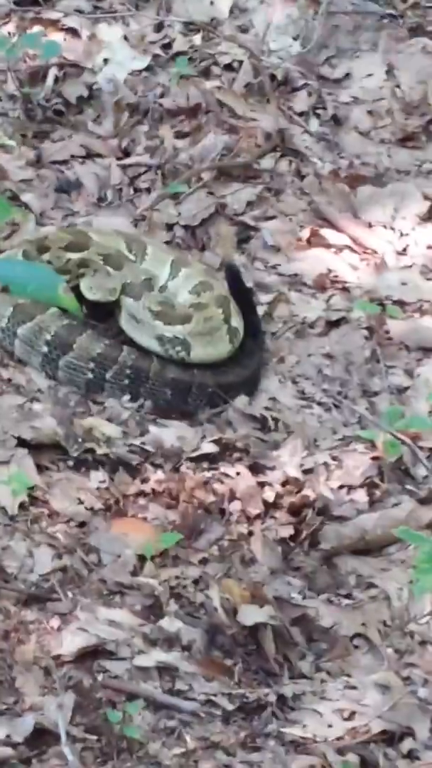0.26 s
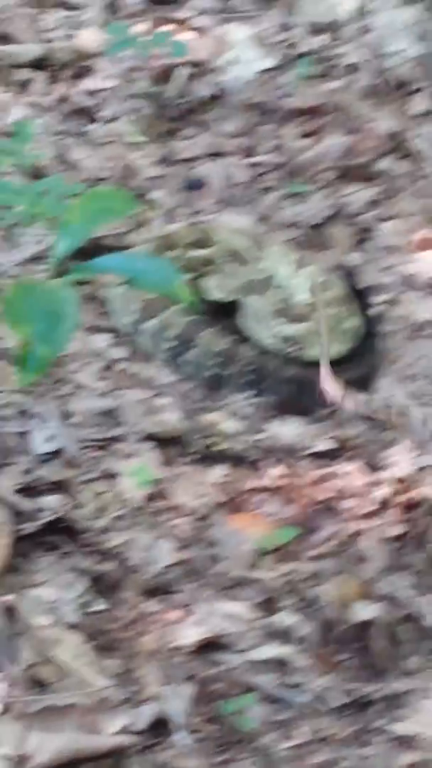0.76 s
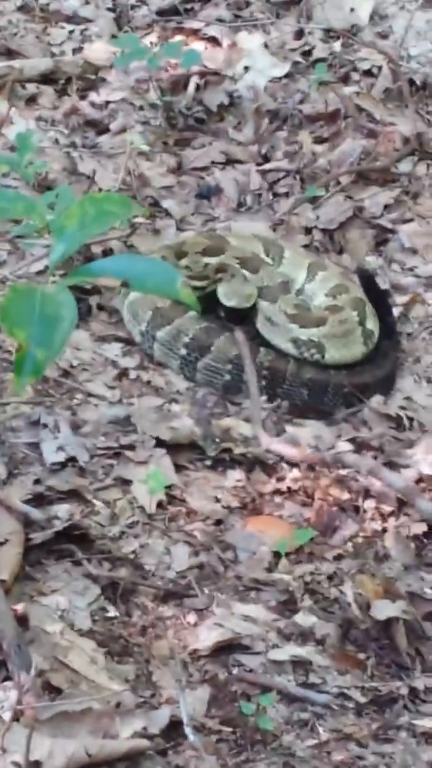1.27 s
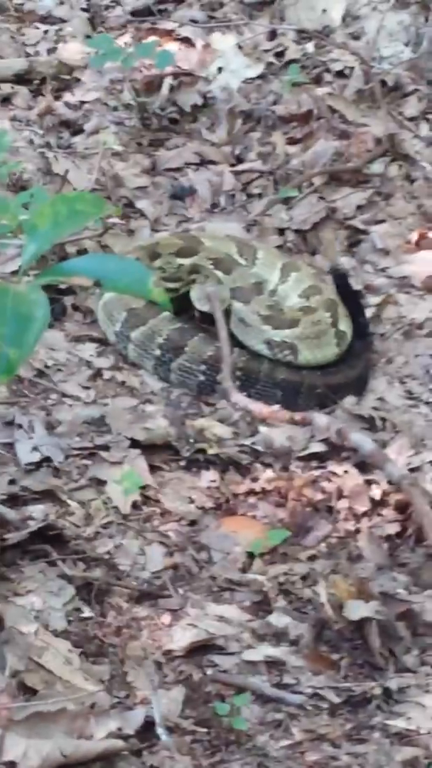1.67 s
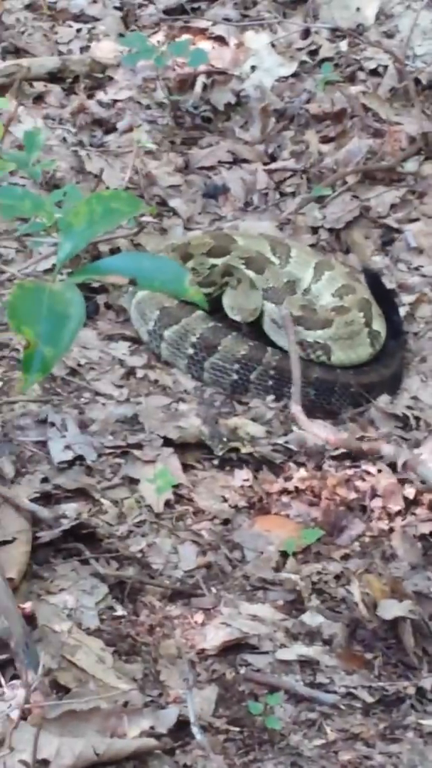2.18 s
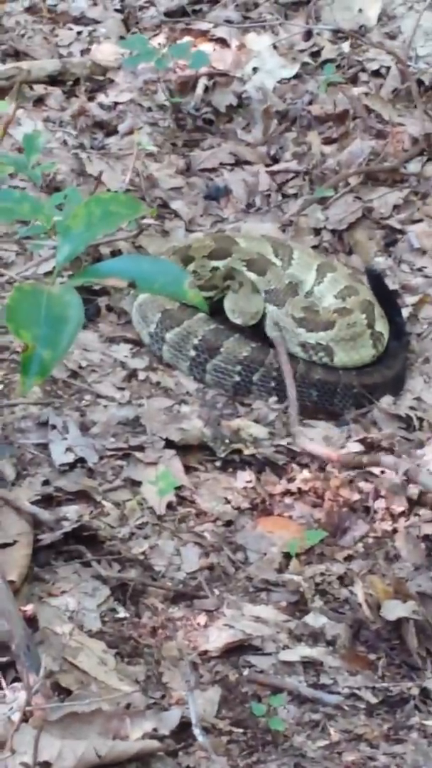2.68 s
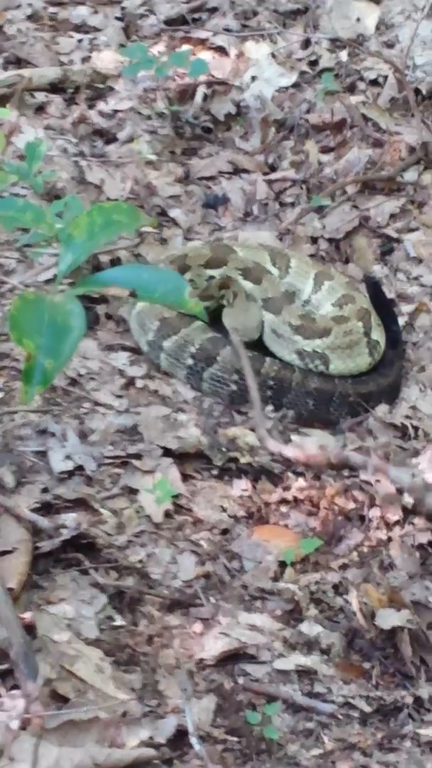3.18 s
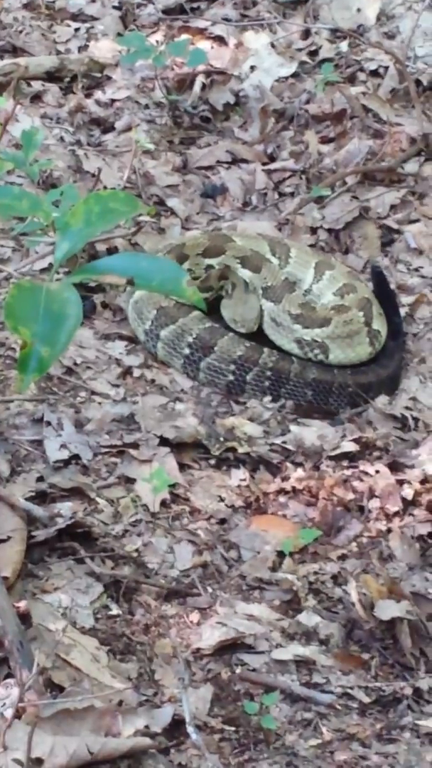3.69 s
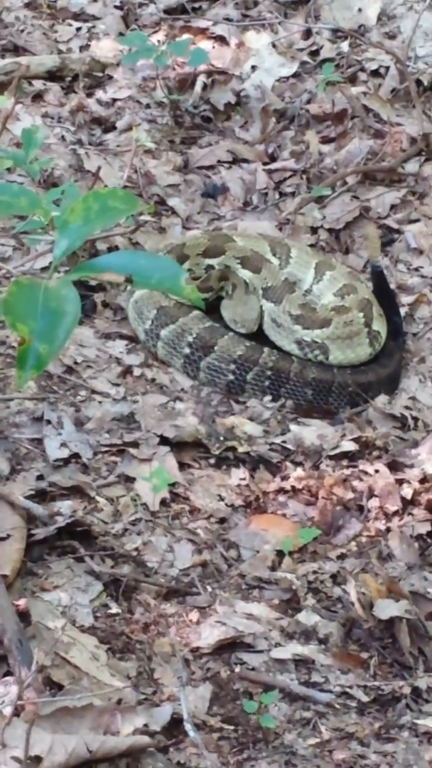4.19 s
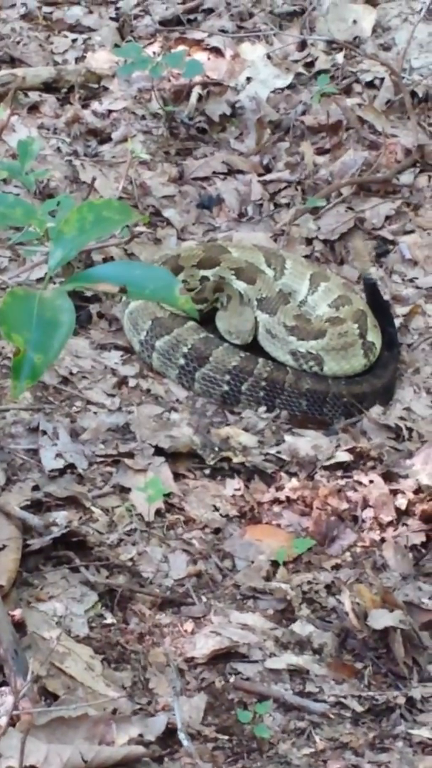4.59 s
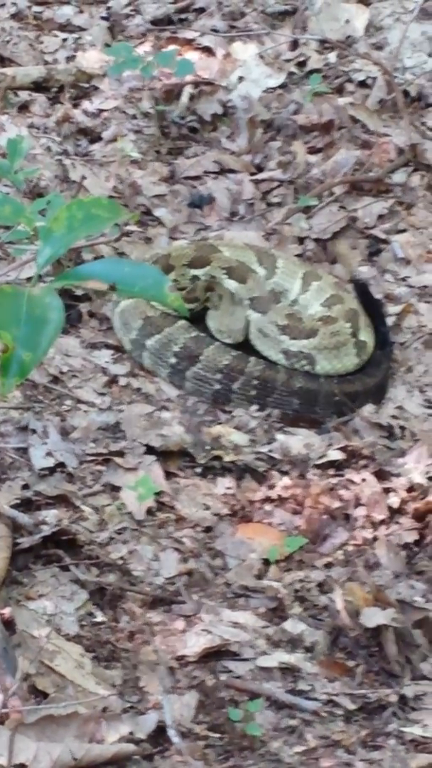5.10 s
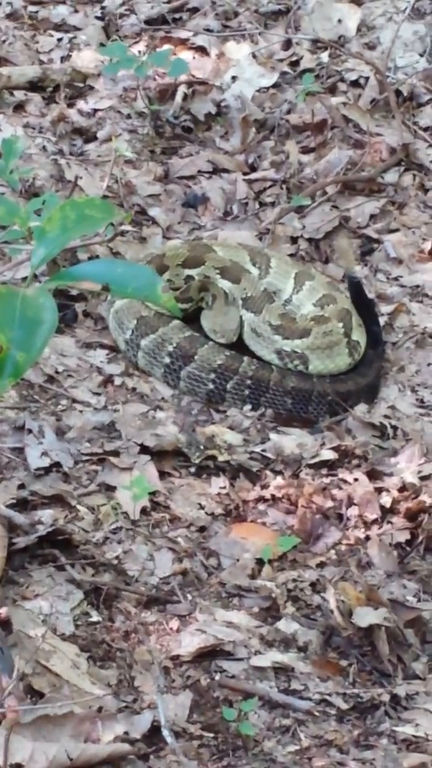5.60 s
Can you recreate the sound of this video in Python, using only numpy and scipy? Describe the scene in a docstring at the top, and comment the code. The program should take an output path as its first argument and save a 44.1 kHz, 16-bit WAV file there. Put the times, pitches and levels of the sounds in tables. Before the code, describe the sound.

From 0 s a rattlesnake's tail buzzes close by in woodland leaf litter: a continuous, dense, dry sizzle, concentrated in the high range, with a rapid flutter of roughly fifty shakes per second. Its level and speed waver slightly, with brief small surges near 0.2, 1.5 and 3.8 s. Very faint low outdoor air lies underneath. Around 3.5 s there is a dull low scuff, then at 3.6 s a stick lands with one sharp, bright snap and short wooden knock, far the loudest moment, followed by a little leaf crackle and a twig click. The buzz sinks around the tap and stays clearly lower until about 4.3 s, revealing faint patchy litter noise and soft scuffs. Small bumps and rustles accompany its swell back by 4.7 s. It then continues steadily, with tiny crisp leaf and twig ticks around 5.5-5.6 s, still buzzing at the end.

```python
"""A rattlesnake buzzes its tail on the leaf litter of a wood, a few steps from a pair of microphone ports.
The tail shakes about fifty times a second and its hollow segments knock together four times a shake.
A stick lands with one sharp tap (noise burst, wooden modes); the buzz sinks around it, stays low, swells back.
Filtered noise makes the scuffs, faint narrow puffs and twigs; sparse cracks make the dry leaves.
Faint patchy low-mid noise is heard while the buzz is low; low, patchy noise is the woodland air."""
import sys
import numpy as np
from scipy import signal
from scipy.fft import rfft, irfft
from scipy.io import wavfile
from scipy.ndimage import uniform_filter1d, minimum_filter1d, map_coordinates

SR = 44100
rng = np.random.default_rng(int(sys.argv[2]) if len(sys.argv) > 2 else 0)


def bounce(signal):
    """Save signal as a 16-bit WAV file at the path given by the first command-line argument."""
    frames = np.transpose(np.atleast_2d(signal))
    limited = np.clip(frames, -1, 1)
    pcm = np.round(limited * 32767).astype(np.int16)
    wavfile.write(sys.argv[1], SR, pcm)


N = 257984
TIME = np.arange(N) / SR
HZ = np.fft.rfftfreq(N, 1 / SR)

# how fast the tail shakes: t/s, shake rate/Hz
TAIL_SHAKES = [(0.0, 51.8), (0.6, 50.2), (1.14, 48.1), (1.59, 48.4), (2.05, 52.8), (2.6, 50.0),
               (3.38, 54.0), (3.73, 51.0), (4.7, 50.4), (5.7, 49.2)]


def amp(db):
    """Decibels to gain."""
    return 10 ** (np.asarray(db) / 20)


def unit(x):
    """Scales to rms 1."""
    return x / np.sqrt(np.mean(x ** 2) + 1e-20)


def curve(rows):
    """A control curve at every sample."""
    return np.interp(TIME, *np.transpose(rows))


def across(rows, hz=HZ):
    """A table read along log frequency."""
    f, value = np.transpose(rows)
    return np.interp(np.log(hz + 1), np.log(f), value)


def colour(x, rows):
    """Minimum-phase filter with the given spectrum: clicks ring after they strike."""
    log_gain = np.log(amp(across(rows, abs(np.fft.fftfreq(N, 1 / SR)))))
    response = np.exp(np.conj(signal.hilbert(log_gain)))[:len(HZ)]
    return irfft(rfft(x) * response, N)


def pair(likeness):
    """Two channels of partly alike white noise."""
    common = rng.standard_normal(N)
    shared = np.clip(likeness, 0, 1)
    return np.sqrt(shared) * common + np.sqrt(1 - shared) * rng.standard_normal((2, N))


def pan(left_db):
    """Channel gains for a left-right level difference."""
    return amp([[left_db / 2], [-left_db / 2]])


def clicks(times, sizes):
    """Impulses at the given times."""
    return np.bincount(np.clip(times * SR, 0, N).astype(int), sizes, N + 1)[:N]


def scatter(x, t60, size=4096):
    """A diffuse patter of reflections, different at each port, with an even spectrum on average."""
    patter = rng.standard_normal((2, size)) * amp(-60 * np.arange(size) / SR / t60)
    patter /= np.linalg.norm(patter, axis=1, keepdims=True)
    return signal.oaconvolve(x[None], patter, axes=1)[:, :N]


def wander(rate_hz):
    """Slow random drift of rms 1."""
    return unit(irfft(rfft(rng.standard_normal(N)) / (1 + (HZ / rate_hz) ** 4), N))


def crumbs(per_s, size_db):
    """Sparse tiny cracks of uneven size and either sign; rms 1."""
    sizes = amp(size_db * np.minimum(rng.exponential(1, N), 3)) * rng.choice([-1, 1], N)
    return unit((rng.random(N) < per_s / SR) * sizes)


def swell(start, attack, hold, release):
    """An envelope from 0 up to 1 and back."""
    rise = (TIME - start) / attack
    fall = 1 + (start + attack + hold - TIME) / release
    return np.clip(np.minimum(rise, fall), 0, 1)


def segment_hits(count=24, spread_s=.00034, jitter_s=.0002, knock_db=.9, hit_db=.8,
                 loose_per_s=11000, loose_db=.6, swing=.07):
    """Each knock spreads over the segments; loose ones also chatter, hardest as the tail whips round."""
    # knocks within one shake: place in the cycle/0-1, strength/dB
    knocks = [(.02, 1.0), (.25, -1.8), (.51, -3.8), (.77, -2.2)]
    turns = np.cumsum(curve(TAIL_SHAKES)) / SR
    place, strength_db = np.transpose(knocks)
    cycles = np.arange(int(turns[-1]) + 1)[:, None]
    # knocks past the end are sent beyond the last sample and dropped
    when = np.interp((cycles + place).ravel(), turns, TIME, right=TIME[-1] + 1)[:, None]

    late, hard = rng.standard_normal(size=(2, len(when), 1))
    lag, force, sign = rng.standard_normal(size=(3, len(when), count))
    times = when + jitter_s * late + spread_s * lag
    sizes_db = np.tile(strength_db, len(cycles))[:, None] + knock_db * hard + hit_db * force
    knocking = clicks(times.ravel(), (np.sign(sign) * amp(sizes_db)).ravel())

    chatter = (rng.random(N) < loose_per_s / SR) * rng.choice([-1, 1], N)
    return knocking + amp(loose_db) * chatter * (1 + swing * np.cos(2 * np.pi * turns))


def contacts(hits, t60, count=24, size=512):
    """Each hit lands on one of many contact points, and each point has its own short ring."""
    point = rng.integers(0, count, N)
    return sum(scatter(hits * (point == k), t60, size=size) for k in range(count))


def even(x, size=3000):
    """Levels the broad spectrum and keeps the fine ripple; rms 1."""
    spectrum = rfft(x)
    broad_power = uniform_filter1d(abs(spectrum) ** 2, size=size)
    return unit(irfft(spectrum / np.sqrt(broad_power + 1e-20), N))


def drift(x, count=16, drift_db=.75):
    """The waving tail turns the rattle, so the bands of its ring swell and fade separately."""
    centres = np.geomspace(3000, 14000, count)
    spectrum = rfft(x)
    bands = (irfft(spectrum * np.interp(HZ, centres, weights), N) for weights in np.eye(count))
    return sum(band * amp(drift_db * wander(rate_hz=7.7)) for band in bands)


def echoes(ports):
    """Bounces off the ground and nearby wood comb the spectrum, a little differently at each port."""
    # bounces: left delay/s, right delay/s, level re the unreflected sound/dB
    bounces = [(.001842, .002273, -18), (.003129, .003294, -15), (.00445, .004393, -21),
               (.0069, .0069, -24), (.0107, .0106, -24)]
    paths = sum(amp(db) * np.exp(-2j * np.pi * HZ * np.array([[left], [right]]))
                for left, right, db in bounces)
    return ports * (1 + paths)


def sway(x, delay_s=.0013, sway_s=.00007, bounce_db=-16):
    """The tail and the hand-held microphones sway, so the ground bounce's comb slides over the buzz."""
    late = (TIME - delay_s - sway_s * wander(rate_hz=1.45)) * SR
    return x + amp(bounce_db) * np.array([map_coordinates(port, [late], order=3) for port in x])


def loudness(waver_db=0.34):
    """Level of the buzz in dB: it follows the shake rate, surges now and then and has one lull."""
    # brief surges of effort: t/s, extra level/dB
    surge_peaks = [(.18, 1.3), (1.47, 1.5), (1.91, 0), (3.27, 0.1), (3.76, 1.5), (5.61, 1.3)]
    buzz_db, usual_shakes_per_s, db_per_extra_shake = -30.5, 49.04, 0.38
    surge_s = 0.028  # bell half-width (one sigma)
    effort = db_per_extra_shake * (curve(TAIL_SHAKES) - usual_shakes_per_s)
    surges = sum(db * np.exp(-.5 * ((TIME - s) / surge_s) ** 2) for s, db in surge_peaks)
    # the buzz sinks around the tap, stays low, then swells back; times in seconds
    lull = -6 * swell(start=3.476, attack=0.36, hold=0.47, release=0.36)
    return buzz_db + effort + surges + lull + waver_db * wander(rate_hz=7.6)


def rattle(contact_t60=0.0016, litter_t60=0.04, wood_t60=0.029, wood_db=-9, own_ring=0.28,
           ring_hz=5400, ring_width_hz=450):
    """Segment hits ring the shell and reach the ports directly and by way of the leaves and trunks."""
    # ring of the hollow horny segments: f/Hz, relative level/dB
    shell_colour = [(600, -58.5), (1250, -63.5), (1650, -31.5), (2300, -24.5), (3200, -9.5), (4800, -4.5),
                    (5400, 1), (5750, 2), (7200, -2.5), (8400, -14), (10600, -19), (12000, -16.5),
                    (13300, -9.5), (14500, -15)]
    # left-right balance of the buzz: f/Hz, level difference/dB
    port_balance = [(2000, 7.6), (3000, 0.3), (4300, 1.1), (5300, 7.9), (6000, 3.4), (6800, -6.2),
                    (8400, -7.2), (10300, -12.3), (12000, -4.3), (14000, -3.0)]
    # phase of the direct buzz: f/Hz, left lead/rad
    port_phase = [(2900, -0.13), (3600, -0.73), (5000, -0.68), (6100, -2.41), (8000, -1.81), (10000, -1.84),
                  (11000, -1.34), (13000, -1.67), (14400, -2.85)]
    # share of the direct buzz's power, alike at both ports: f/Hz, likeness/0-1
    port_likeness = [(2000, .5), (2900, .85), (4500, .84), (6000, .9), (7300, .85), (8400, .56),
                     (10400, .37), (12000, .47), (13200, .66), (14400, .52)]
    # gain of the main shell resonance: t/s, level/dB
    ring_level = [(0, -1.5), (.7, -2.5), (1.9, 0.35), (3.5, -2), (5.85, -1)]

    hits = unit(segment_hits())
    share = np.clip(own_ring, 0, 1)
    struck = np.sqrt(1 - share) * hits + np.sqrt(share) * unit(contacts(hits, contact_t60)[0])
    diffuse = unit(unit(contacts(hits, litter_t60)) + amp(wood_db) * scatter(hits, wood_t60))

    likeness = np.clip(across(port_likeness), 0, 1)
    side = np.array([[.5], [-.5]])
    direct = rfft(drift(even(struck))) * np.exp(1j * side * across(port_phase))
    ports = np.sqrt(likeness) * direct + np.sqrt(1 - likeness) * rfft(diffuse)
    ports = ports * amp(side * across(port_balance))
    buzz = colour(sway(irfft(echoes(ports), N)), shell_colour)

    # the main shell resonance stands out more or less with the pose of the tail
    ring_band = np.exp(-.5 * ((HZ - ring_hz) / ring_width_hz) ** 2)
    ring = irfft(rfft(buzz) * ring_band, N)
    buzz = buzz + ring * (amp(curve(ring_level)) - 1)
    return buzz / buzz.mean(0).std() * amp(loudness())


def air(air_db=-56, patchy_db=6.0, count=8):
    """Still woodland air: a low rumble whose bands swell and fade on their own."""
    # spectrum of the rumble: f/Hz, relative level/dB
    air_colour = [(15, 12), (45, -12), (90, 7.5), (160, 5.5), (250, -10), (400, -44.5), (1500, -59),
                  (4000, -12)]
    noise = rfft(colour(pair(likeness=0.42), air_colour))
    centres = np.geomspace(40, 700, count)
    bands = (np.interp(HZ, centres, weights) for weights in np.eye(count))
    rumble = sum(irfft(noise * band, N) * amp(patchy_db * wander(rate_hz=8.4)) for band in bands)
    return amp(air_db) * unit(rumble) * pan(left_db=2.5)


def scuffs_and_narrow_puffs():
    """Bell-shaped bursts of gritty noise: wide bands make dull scuffs, narrow ones faint puffs of noise."""
    # bursts: peak t/s, level/dB, centre f/Hz, band sigma/octaves, length sigma/s # the narrowest, faintest
    # rows, at 1.493, 1.612, 4.27, 4.789 and 4.93 s, are the faint narrow puffs, the others the scuffs
    noise_bursts = [(3.482, -48.5, 378, 0.76, 0.0077), (3.508, -42, 211, 0.66, 0.0082),
                    (3.502, -54.5, 800, 0.52, 0.022), (3.598, -44, 520, 0.55, 0.0023),
                    (3.601, -47.5, 450, 1.7, 0.017), (3.684, -52, 1140, 0.61, 0.016),
                    (3.857, -64, 400, 0.95, 0.028), (3.922, -58.5, 380, 0.62, 0.019),
                    (3.977, -58, 550, 1.3, 0.032), (4.03, -46, 850, 1.6, 0.012),
                    (4.084, -61, 400, 0.42, 0.021), (4.17, -67, 370, 0.48, 0.023),
                    (4.27, -63.5, 313, 0.27, 0.016), (4.345, -62.5, 700, 1.5, 0.024),
                    (4.421, -48.5, 300, 0.38, 0.005), (4.463, -47.5, 1350, 1.6, 0.038),
                    (4.527, -45.5, 600, 2.1, 0.0096), (4.564, -44.5, 220, 0.84, 0.0095),
                    (4.789, -57, 327, 0.3, 0.017), (4.93, -61.5, 344, 0.24, .041),
                    (1.493, -60, 620, 0.14, 0.039), (1.612, -66, 510, 0.13, 0.044)]
    grit = pair(likeness=0.19) + crumbs(per_s=900, size_db=2.5)
    out = np.zeros((2, N))
    for s, db, centre_hz, octaves, length in noise_bursts:
        near = abs(TIME - s) < 4 * length
        shape = np.exp(-.5 * ((TIME[near] - s) / length) ** 2)
        hz = np.fft.rfftfreq(len(shape), 1 / SR)
        band = np.exp(-.5 * (np.log2((hz + 1) / centre_hz) / octaves) ** 2)
        burst = unit(irfft(rfft(grit[:, near]) * band, len(shape)))
        out[:, near] += amp(db) * burst * shape
    return out * pan(left_db=3)


def modes(rows):
    """The ring of a struck piece of wood: decaying sines."""
    t = TIME[:SR // 4]
    return sum(amp(db - 60 * t / t60) * np.sin(2 * np.pi * hz * t) for hz, db, t60 in rows)


def stick(ring_db=-39, snap_db=3.5, snap_s=.00039):
    """A burst of splintering and a short wooden knock at each landing."""
    # the stick lands and settles: t/s, relative level/dB
    landings = [(3.5827, 0), (3.5886, -34), (3.5936, -27)]
    # its snap: f/Hz, relative level/dB
    snap_colour = [(200, -15), (600, -10), (1200, -7), (1900, -7), (2500, -18), (3500, -10), (5500, -15),
                   (7500, -1), (9500, -7), (11700, -1), (14500, -4), (16000, -25)]
    # its wooden ring: f/Hz, relative level/dB, t60/s
    wood_modes = [(404, -14, 0.069), (540, -5, 0.14), (930, -3, 0.1), (1030, -8.5, 0.26), (620, 8, 0.015),
                  (1140, -3, 0.0087)]
    s, level_db = np.transpose(landings)
    blows = clicks(s, amp(level_db))
    t = TIME[:SR // 4]
    burst = signal.oaconvolve(blows, t / snap_s * np.exp(1 - t / snap_s))[:N]  # peaks at snap_s
    snap = colour(pair(likeness=0.3) * burst, snap_colour)
    knock = signal.oaconvolve(blows, modes(wood_modes))[:N]
    return amp(snap_db) * snap * pan(left_db=-2) + amp(ring_db) * knock * pan(left_db=5)


def leaves(crack_t60=0.0074):
    """Dry leaves crackle in short clumps: sparse cracks, smeared and coloured."""
    # leaves stirring: peak t/s, level/dB, length sigma/s
    rustles = [(3.591, -31, .005), (3.62, -40, .025), (3.685, -42, .012), (3.75, -42, .04),
               (4.435, -42, .015), (4.495, -42, .03), (5.528, -40, .004), (5.579, -33, .002),
               (5.593, -31, .0015), (5.615, -41, .015)]
    # colour of their crackle: f/Hz, relative level/dB
    leaf_colour = [(600, -62), (1100, -17), (1800, -4), (3500, -9), (7000, 4.5), (10000, -1.5),
                   (14500, -23)]
    stir = sum(amp(db) * np.exp(-.5 * ((TIME - s) / length) ** 2) for s, db, length in rustles)
    cracks = scatter(crumbs(per_s=490, size_db=-3.5), crack_t60)
    return unit(colour(cracks, leaf_colour)) * stir


def patchy_gain(fade_s=.03):
    """Gain of the patchy noise: each spell fades in and out."""
    # spells of faint noise while the buzz is low: start t/s, length/s, level/dB
    spells = [(3.593, 0.18, -67), (3.804, 0.35, -64), (4.114, 0.23, -65), (4.318, .1, -63),
              (4.418, 0.21, -61)]
    return sum(amp(db) * swell(s, fade_s, length - 2 * fade_s, fade_s) for s, length, db in spells)


def patchy_noise(count=9, crumb_db=6, patchy_db=5):
    """Faint low-mid noise and tiny cracks, heard while the buzz is low; each band swells on its own."""
    # colour of the patchy noise: f/Hz, relative level/dB
    patchy_colour = [(80, -35), (220, -10), (340, 13), (600, -13), (1100, 4), (1500, -20.5), (2000, -15),
                     (4000, -17.5)]
    centres = np.geomspace(220, 3000, count)
    hiss = rfft(pair(likeness=0.23))
    tone = amp(across(patchy_colour))
    out = 0
    for weights in np.eye(count):
        grainy = hiss + amp(crumb_db) * rfft(crumbs(per_s=77, size_db=2))
        band = irfft(grainy * tone * np.interp(HZ, centres, weights), N)
        out = out + band * amp(patchy_db * wander(rate_hz=9.2))
    return unit(out) * patchy_gain() * pan(left_db=3)


def twigs(left_db=6, crack_s=.0024):
    """Small dry twigs give way in a soft burst of splinters, each at its own pitch."""
    # twigs click in the litter: t/s, level/dB, pitch ratio
    twig_clicks = [(3.6795, -46, 0.96), (4.027, -57, 0.87), (5.525, -53.5, 1.75), (5.576, -56, 1.56),
                   (5.6075, -54, 1.6)]
    # colour of a cracking twig at pitch ratio 1: f/Hz, relative level/dB
    twig_colour = [(560, -54), (860, 1), (1150, -3), (1500, -2), (2100, -17), (3100, -2), (4500, -4),
                   (9000, -28)]
    out = np.zeros(N)
    t = TIME[:2048]
    hz = np.fft.rfftfreq(len(t), 1 / SR)
    shape = (t / crack_s) ** 2.3 * np.exp(-t / crack_s)
    for s, db, pitch in twig_clicks:
        noise = rfft(rng.standard_normal(len(t)))
        fibres = irfft(noise * amp(across(twig_colour, hz / pitch)))
        part = out[round(s * SR):][:len(t)]  # a view: adding to it adds to out
        part += amp(db) * unit(fibres * shape)[:len(part)]
    return out * pan(left_db)


def scene():
    """The snake, the air, the scuffs and puffs, the stick, the leaves, the patchy noise and the twigs."""
    return rattle() + air() + scuffs_and_narrow_puffs() + stick() + leaves() + patchy_noise() + twigs()


def record(dry, ceiling_db=-5, edge_hz=14650):
    """A look-ahead limiter turns down just before a sharp peak; then a steep low-pass."""
    allowed = np.minimum(1, amp(ceiling_db) / (abs(dry).max(0) + 1e-9))
    held = minimum_filter1d(allowed, size=720, origin=-320)  # looks about 15 ms ahead
    limited = dry * uniform_filter1d(held, size=60)
    low_pass = signal.firwin(601, edge_hz, window=("kaiser", 8), fs=SR)
    return signal.oaconvolve(limited, low_pass[None], "same", axes=1)


dry = scene()
out = record(dry)
bounce(out)
```